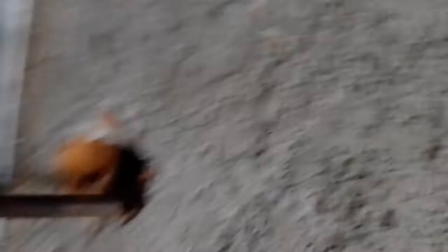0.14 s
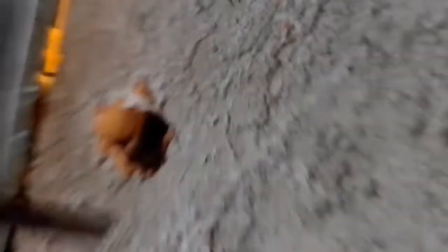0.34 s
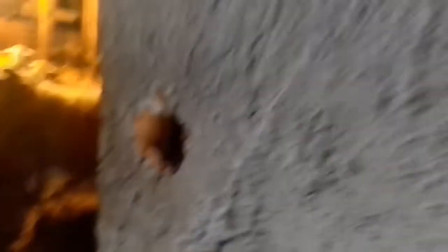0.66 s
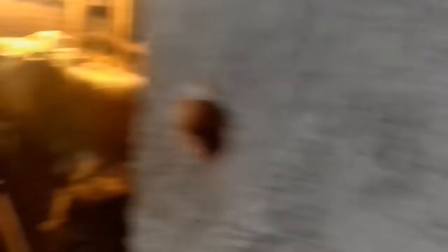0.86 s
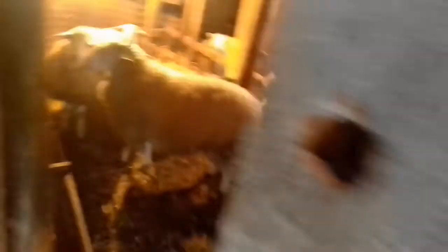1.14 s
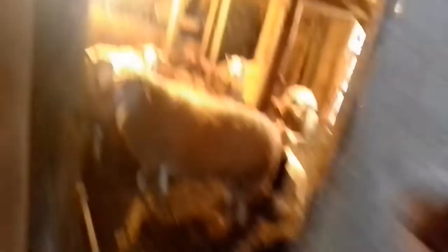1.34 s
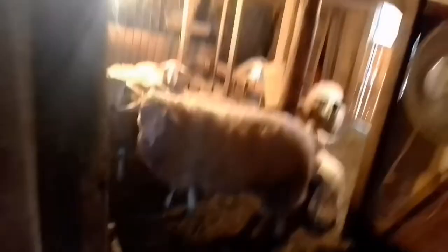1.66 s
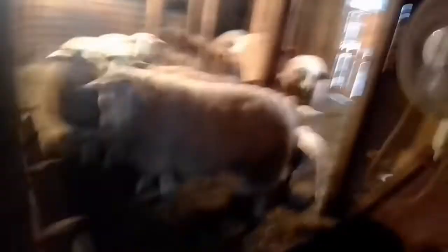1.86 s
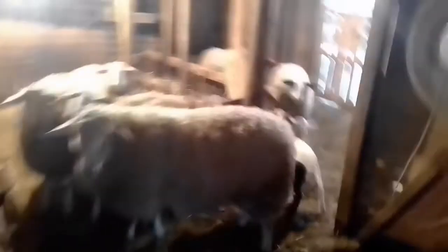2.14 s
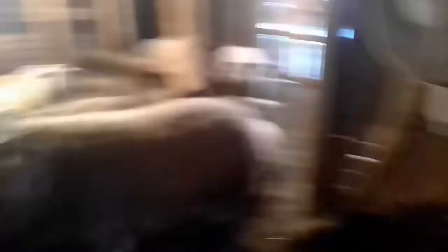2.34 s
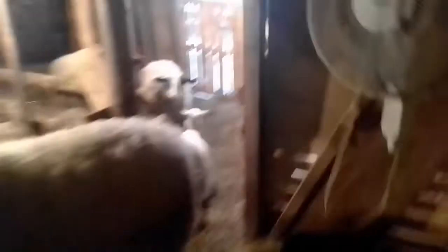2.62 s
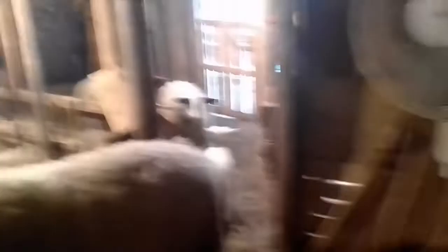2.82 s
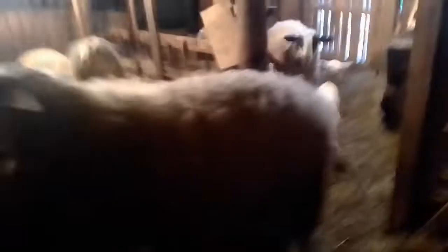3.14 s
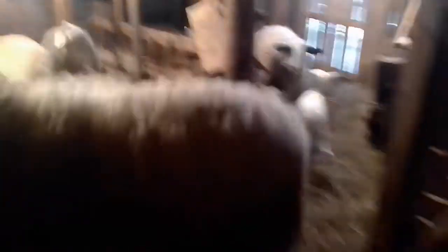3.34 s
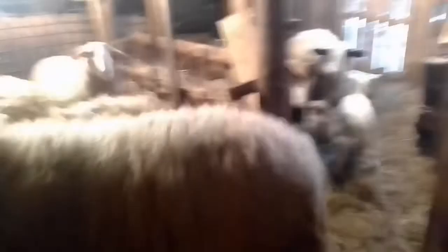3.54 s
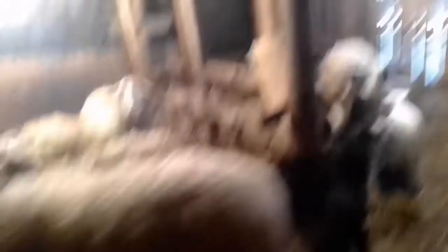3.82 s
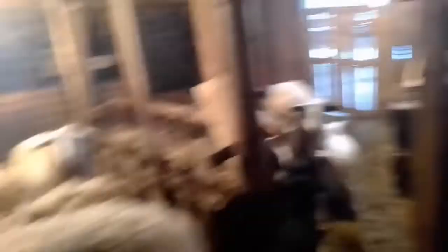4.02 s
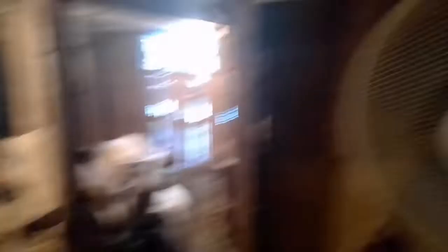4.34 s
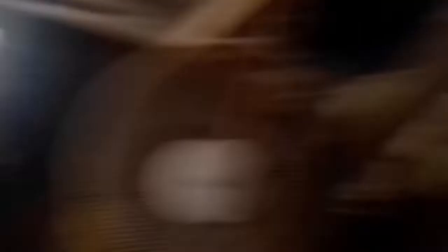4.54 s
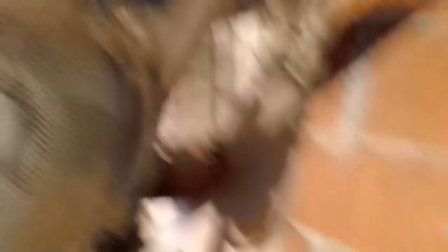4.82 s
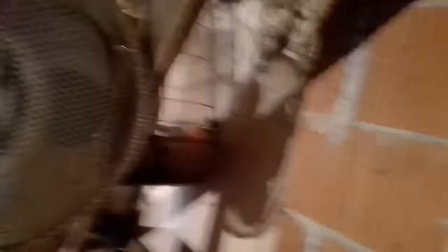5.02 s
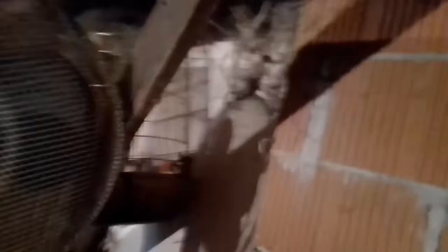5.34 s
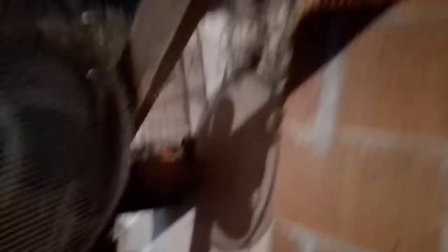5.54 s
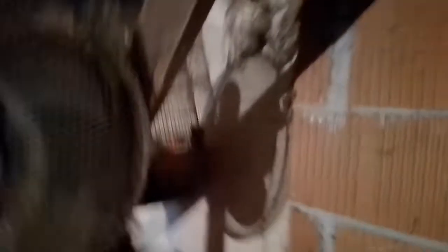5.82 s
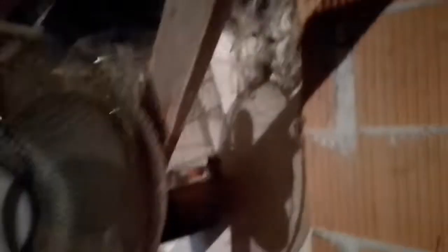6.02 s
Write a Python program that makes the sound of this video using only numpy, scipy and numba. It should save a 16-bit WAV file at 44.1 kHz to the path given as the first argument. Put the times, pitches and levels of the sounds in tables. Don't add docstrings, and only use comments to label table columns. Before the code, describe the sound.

Harsh metallic bolt clatter and knocks open, straw rustles, hinges squeak thinly, then a sheep gives a single raspy bleat before quiet rustling.

```python
import sys
import numpy as np
from scipy import signal
from scipy.fft import rfft, irfft, next_fast_len
from scipy.io import wavfile
from scipy.ndimage import uniform_filter1d
from numba import njit

SR = 44100
rng = np.random.default_rng(int(sys.argv[2]) if len(sys.argv) > 2 else 0)


def boost(x):
    u = np.asarray(x, float) / 20
    return 10 ** u


def output_pcm(signal):
    pcm = np.clip(np.atleast_2d(signal).T, -1, 1) * 32767
    wavfile.write(sys.argv[1], SR, np.round(pcm).astype(np.int16))


N = 271876
TIME = np.arange(N) / SR

# (time [s], level [dB])
FLOCK_LEVEL = [(0.0, -46), (.35, -59), (.44, -62), (.8, -63.5), (1.24, -75.5), (1.47, -58), (1.75, -54),
               (2.0, -49.5), (2.28, -62), (2.69, -61.5), (2.9, -67), (3.2, -54.5), (4.0, -61),
               (4.26, -64.5), (4.66, -64), (6.16, -66.5)]
# (frequency [Hz], density [dB per Hz])
FLOCK_COLOUR = [(110, -51.5), (180, -34.5), (231, -8), (409, -4), (982, -3), (1260, -4), (4470, -8),
                (5000, -9), (6500, -45), (11000, -120)]
# (centre [s], peak [dB], half length [s])
STEPS = [(.25, -42.5, 0.26), (1.0, -65, 0.061), (1.563, -51.5, 0.065), (1.672, -48.5, 0.045),
         (1.986, -44.5, 0.15), (2.298, -54, 0.11), (2.756, -56.5, 0.061), (2.91, -64, 0.036),
         (3.169, -46.5, 0.1), (3.553, -43.5, 0.37), (3.93, -35, .055), (4.03, -42, .07),
         (4.15, -49.5, 0.086), (4.404, -48.5, 0.22), (4.932, -47.5, 0.16), (5.4, -52, 0.1),
         (5.815, -49, 0.087), (5.97, -63.5, .03), (6.139, -51.5, 0.034)]
# (frequency [Hz], density [dB per Hz])
RUSTLE_COLOUR = [(1470, -39), (2500, -7.5), (2970, -13), (3410, -12), (5920, -6.5), (9580, 2.5),
                 (14800, -9.5), (16000, -17)]
# (frequency [Hz], density [dB per Hz])
RUMBLE_COLOUR = [(10, -3.5), (70, -4.5), (95, -12), (125, -29), (200, -45)]
# (frequency [Hz], density [dB per Hz])
HUSH_COLOUR = [(88, -57), (150, -24.5), (254, -8), (341, -5.5), (1100, -10.5), (1530, -5), (5050, -8),
               (9440, -3), (14800, -3), (16000, -13)]
# (start [s], length [s], frequency [Hz], level [dB])
SINGING = [(0.045, .045, 7560, -39), (0.073, 0.043, 8180, -17), (.025, .04, 12100, -46),
           (.074, .05, 12120, -28), (.076, .014, 12700, -32.5), (.085, .008, 2072, -13),
           (.099, .024, 2072, -11.5), (.128, .02, 2072, -15), (.085, 0.046, 3759, -19.5),
           (.128, 0.035, 3759, -23), (.09, 0.043, 780, -30), (.955, .025, 4350, -58),
           (.125, .04, 1210, -33), (1.768, 0.027, 1480, -58), (0.081, .07, 5300, -36),
           (.09, 0.045, 9210, -29.5), (.08, 0.11, 392, -35), (.172, 0.023, 501, -27.5),
           (0.205, 0.02, 7545, -33), (.2345, 0.008, 7545, -10), (.2345, 0.006, 8180, -9),
           (.252, 0.071, 11000, -30), (0.202, 0.02, 3759, -36), (2.03, .04, 15000, -43),
           (2.088, 0.053, 12690, -28), (2.03, 0.14, 13500, -46), (2.475, .025, 14000, -48),
           (2.475, .025, 13600, -42)]
# (start [s], length [s], frequency [Hz], level [dB])
SQUEALS = [(.84, 0.16, 11900, -46), (.84, 0.14, 15000, -53), (1.88, 0.046, 9300, -45),
           (1.97, .08, 8440, -40.5), (1.99, .045, 9900, -31), (2.076, 0.049, 9950, -35.5),
           (2.07, .05, 15200, -46), (2.505, 0.14, 9390, -24.5), (2.506, 0.11, 10040, -22.5),
           (2.52, .17, 10160, -31), (2.506, 0.155, 6260, -37), (2.701, 0.11, 1710, -59),
           (2.702, 0.089, 3820, -57.5), (3.223, 0.2, 9170, -31.5), (3.899, 0.16, 10030, -29.5),
           (3.905, 0.16, 11550, -35), (3.928, 0.24, 10600, -39), (4.171, 0.16, 1647, -57),
           (4.199, .14, 3750, -55), (4.25, 0.19, 12800, -49)]
# (start [s], length [s], frequency [Hz], level [dB])
CHATTER = [(0.091, 0.078, 1270, -20), (0.158, 0.02, 10500, -15), (.176, .014, 9700, -11),
           (.2305, .002, 7800, -24), (5.06, .02, 1400, -47), (1.555, .015, 3500, -26),
           (.118, .006, 7300, -18), (.84, .02, 950, -33), (.865, .02, 1900, -33), (.95, .06, 900, -49),
           (1.046, .006, 1650, -48), (0.254, 0.014, 14700, -9), (0.3, 0.08, 400, -50),
           (0.851, 0.1, 770, -40), (1.553, 0.0073, 3070, -23.5), (1.545, 0.018, 450, -42.5),
           (.652, .03, 2540, -31), (0.87, 0.041, 620, -37), (2.298, 0.035, 360, -59.5),
           (1.234, 0.01, 1440, -36), (1.234, 0.012, 3060, -33.5), (.655, 0.031, 1500, -34),
           (.92, 0.047, 1950, -45.5), (1.55, .02, 296, -57), (3.21, .025, 4000, -40),
           (1.166, .01, 1400, -41), (1.166, .008, 2900, -41), (.458, .004, 8800, -15),
           (.474, .003, 8800, -18), (.4845, .003, 7200, -16), (.254, .025, 11000, -18),
           (.278, .015, 7400, -24), (.513, .003, 9000, -33), (.85, .05, 2200, -32), (5.0, .04, 850, -48),
           (2.461, 0.048, 9900, -38.5)]
# (time [s], level [dB])
SCRAPE_LEVEL = [(.06, -62), (.078, -31.5), (.087, -22), (.13, -23.5), (.187, -20.5), (.195, -29),
                (.232, -26), (.29, -35), (.335, -33), (.42, -54)]
# (frequency [Hz], density [dB per Hz])
SCRAPE_COLOUR = [(120, -77), (200, -52), (330, -14), (450, -4.5), (1650, -11.5), (2050, -8.5),
                 (2860, -16.5), (3690, -12), (8420, -14.5), (16000, -32)]
# (time [s], clatter [dB], board [dB], thud [dB], decay t60 [s])
GATE_BLOWS = [(0.0768, -15, -22, -26, 0.3), (.0843, -9, -12, -5.5, 0.069), (0.1014, -4, -12, -26, 0.18),
              (.1294, -5, -11.5, -19, 0.3), (0.2342, 4, -19, -26, 0.061), (0.2528, 1, -27, -22, 0.094),
              (.2767, -2.5, -21.5, -18.5, 0.17), (0.2857, -6, -24, -34, 0.11),
              (.3194, -13.5, -39, -21.5, 0.15), (.452, -27, -22.5, -18, 0.16), (.458, -6, -23, -25, 0.14),
              (0.475, -11, -22, -22, 0.046), (0.4845, -9, -12, -20, .065), (0.6218, -34, -40, -30.5, .11),
              (0.6517, -9, -17, -17.5, 0.095), (0.8216, -26, -26.5, -27, 0.072),
              (0.8322, 2, -14.5, -18, 0.23), (.9348, -28, -50, -37, .047)]
# (until [s], frequency [Hz])
GATE_NOTES = [(.3, 2030), (.6, 1180), (.7, 1570), (.83, 3300), (1.0, 940)]
# (time [s], clatter [dB], board [dB], thud [dB], plank tone [Hz])
PEN_BLOWS = [(1.046, -46, -52, -38, 997.5), (1.089, -40.5, -50, -38.5, 1329),
             (1.1666, -57.5, -40, -35.5, 1367), (1.2339, -42, -31, -31, 3120),
             (1.4059, -21, -34.5, -34, 2360), (1.497, -40, -64.5, -66, 1850), (1.5464, -38, -45, -27, 1036),
             (1.5549, -27, -29, -33, 3270), (1.571, -36, -59, -33, 3330), (1.767, -23, -32, -59.5, 1458),
             (1.7823, -19, -31, -61, 2850), (1.811, -32, -44, -33, 2270), (1.8494, -31, -43, -49, 3050),
             (1.9386, -10, -27, -27.5, 1826), (2.0724, -29, -33, -37, 2100), (2.1598, -51, -46, -33.5, 972),
             (2.2444, -40.5, -52.5, -37.5, 956), (2.33, -37, -56, -55, 1360), (2.464, -47, -43, -61, 1010),
             (2.508, -25, -36, -32, 1950), (2.55, -27, -39, -36.5, 1530), (2.609, -30, -45, -35, 1330),
             (2.6965, -31.5, -48, -63, 1800)]
# (time [s], clatter [dB], board [dB], thud [dB])
AISLE_BLOWS = [(3.208, -21.5, -46, -61), (3.222, -24, -48, -55), (4.114, -29, -60, -68),
               (4.6146, -33.5, -44, -47), (4.9675, -35, -44, -42), (5.0094, -21.5, -36, -37),
               (5.0174, -24, -36.5, -50), (5.0592, -35, -56, -46), (5.3502, -43.5, -59, -58.5),
               (5.896, -38.5, -66.5, -64.5), (6.102, -39.5, -58, -58)]
# (frequency [Hz], density [dB per Hz])
CLATTER_COLOUR = [(2350, -28), (4000, -10.5), (5190, -7), (9170, 0.5), (12700, -8), (14600, -7.5),
                  (16000, -21.5)]
# (frequency [Hz], width [Hz], level [dB])
BOARD_MODES = [(2074, 740, -1.5), (2920, 1000, 2), (3730, 1500, -1.5), (4870, 790, -9.5)]
# (frequency [Hz], width [Hz], level [dB])
THUD_MODES = [(454, 250, -9), (723, 240, -4.5), (1030, 270, 2), (1275, 620, 1), (1640, 470, 1)]
# (band centre [Hz], t60 [s])
BARN_DECAY = [(500, 0.33), (1500, 0.17), (4000, 0.23), (12000, 0.28)]
# (time [s], level [dB])
THUMPS = [
    (.1, -44),
    (0.236, -31),
    (0.834, -53),
    (3.61, -53),
]
# (time [s], pitch [Hz], effort [dB])
BLEAT = [
    (3.25, 213, -25),
    (3.31, 205, -19.5),
    (3.37, 162, -11),
    (3.5, 171.2, -12.5),
    (3.59, 163.1, -14),
    (3.73, 170, -16),
    (3.86, 156.5, -13.5),
    (3.905, 145.3, -25),
    (3.99, 144.8, -59),
]
# (time [s], roughness [0-1], strong-weak share [0-1])
HOARSENESS = [(3.25, .45, .55), (3.34, .45, .6), (3.53, .4, .4), (3.6, .33, .2), (3.7, .18, .05),
              (3.8, .28, .15), (3.86, .3, .2), (3.91, .12, 0)]
# (deepest at [s], depth [dB], closing time [s])
CATCHES = [(3.271, 12, .014), (3.287, 5, .006), (3.304, 5, .007), (3.327, 9, .014), (3.355, 18, .008),
           (3.381, 5, .006), (3.4, 8, .02), (3.46, 9, .02), (3.531, 5, .016), (3.592, 2, .01),
           (3.654, 5, .008), (3.731, 4, .01), (3.783, 2, .01), (3.84, 3, .015)]
# (time [s], front resonance [Hz], lip resonance [Hz], low throat resonance [Hz])
MOUTH = [(3.25, 2250, 2800, 760), (3.34, 2100, 2800, 800), (3.39, 2350, 3040, 830), (3.43, 2100, 2600, 810),
         (3.5, 2130, 2700, 800), (3.57, 2280, 2800, 760), (3.76, 2420, 2950, 700), (3.88, 2620, 3000, 750),
         (3.93, 2620, 3000, 715)]
# (frequency [Hz], width [Hz], level [dB])
TONGUE_MODES = [(1780, 190, 0)]
# (frequency [Hz], width [Hz], level [dB])
THROAT_MODES = [(990, 110, -8), (1360, 70, -10)]
# (frequency [Hz], width [Hz], level [dB])
RASP_MODES = [(3800, 260, -1), (3300, 250, -5), (4550, 450, -1), (5480, 640, -0.5), (6000, 500, 2.5),
              (6400, 480, 2), (7100, 600, 0), (7800, 600, -1), (8500, 500, 3), (9100, 400, 3),
              (10000, 300, -1)]
# (time [s], frequency [Hz])
RASP_TOP = [
    (3.42, 5500),
    (3.6, 9500),
]
# (time [s], level [dB])
SNAP_LEVEL = [
    (3.36, -9),
    (3.47, -2),
]


def level(x):
    return x / np.sqrt(np.mean(x ** 2) + 1e-30)


def curve(rows, off=None):
    s, *columns = np.transpose(rows)
    return [np.interp(TIME, s, c, off, off) for c in columns]


def colour(x, points):
    size = next_fast_len(len(x))
    hz, db = np.transpose(points)
    bin_hz = np.arange(size // 2 + 1) * SR / size
    gain = boost(np.interp(np.log(bin_hz + 1), np.log(hz), db))
    return level(irfft(rfft(x, size) * gain, size)[:len(x)])


def butter(x, order, hz, kind):
    return signal.sosfilt(signal.butter(order, hz, kind, fs=SR, output="sos"), x)


@njit
def svf(x, hz, width):
    y, b, l = np.empty(len(x)), 0., 0.
    for i in range(len(x)):
        g, k = np.tan(np.pi * hz[i] / SR), width / hz[i]
        v = (b + g * (x[i] - l)) / (1 + g * (g + k))
        b, l, y[i] = 2 * v - b, l + 2 * g * v, k * v
    return y


def resonate(x, modes):
    out = 0
    for k, (hz, width, db) in enumerate(modes):
        out = out + (-1) ** k * boost(db) * svf(x, np.full(len(x), 1. * hz), 1. * width)
    return out


def walk(rate, size=N):
    k = int(SR / rate)
    held = np.repeat(rng.standard_normal(size // k + 1), k)
    return 1.3 * uniform_filter1d(uniform_filter1d(held, k), k)[:size]


def grains(rate, spread_db):
    size = boost(spread_db * np.minimum(rng.exponential(size=N), 3))
    size = size * (rng.random(N) < rate / SR)
    return rng.standard_normal(N) * np.sqrt(1 + uniform_filter1d(size ** 2, size=60) * 10)


def flock():
    return boost(curve(FLOCK_LEVEL)[0] + 2 * walk(40)) * colour(grains(150, 1.8), FLOCK_COLOUR)


def still_air():
    rumble = boost(-76 + 2 * walk(25)) * colour(rng.standard_normal(N), RUMBLE_COLOUR)
    return rumble + boost(-56) * colour(rng.standard_normal(N), HUSH_COLOUR)


def rustle():
    moving = boost(-61)
    for s, db, half in STEPS:
        moving = moving + boost(db) * np.exp(-((TIME - s) / half) ** 2)
    return moving * boost(2.1 * walk(25)) * colour(grains(300, 1.7), RUSTLE_COLOUR)


def squeaks():
    out, size = np.zeros(N), int(.6 * SR)
    t = np.arange(size) / SR
    rubs = [(*r, 20.5 + .0015 * r[2]) for r in SINGING]
    rubs += [(*r, 120) for r in SQUEALS]
    rubs += [(*r, .2 * r[2]) for r in CHATTER]
    for start, length, hz, db, width in rubs:
        contact = np.clip(t / .002, 0, 1) * np.clip((length - t) / .015 + 1, 0, 1)
        patchy_db = np.clip(width / 40, 1, 2.2) * walk(60, size=size)
        rub = contact * boost(patchy_db - 5 * t / length)
        slip_hz = hz * (1 + .002 * walk(20.3, size=size))
        tone = np.sin(2 * np.pi * np.cumsum(slip_hz) / SR)
        lock = 2.8 * np.exp(-width / 50) * np.sqrt(width / SR * 6) * tone
        lock = lock * (1 + np.exp(-t / .003) / (np.pi * width * .006))
        force = rub * (rng.standard_normal(size) + lock)
        held = np.exp(-np.clip(t - length - .015, 0, 1) / .02)
        i = int(start * SR)
        out[i:i + size] += held * boost(db) * np.sqrt(SR / width / 6) * svf(force, slip_hz, 1. * width)
    return out


def scrape():
    scrape_db = curve(SCRAPE_LEVEL, off=-120)[0] - 5 + 3.5 * walk(150)
    return boost(scrape_db) * colour(grains(600, 3.85), SCRAPE_COLOUR)


def knocks():
    drive, notes = np.zeros((4, N)), np.zeros(N)
    shiver = rng.standard_normal(N)
    blows = []
    for *blow, t60 in GATE_BLOWS:
        note_hz = next(hz for until, hz in GATE_NOTES if blow[0] < until)
        blows.append((*blow, note_hz, t60, t60))
    blows += [(*b, 0.13, .065) for b in PEN_BLOWS]
    blows += [(*b, 1400, 0.15, 0.16) for b in AISLE_BLOWS]
    for s, clatter_db, board_db, thud_db, note_hz, t60, wood_t60 in blows:
        i = int(s * SR)
        t = np.arange(min(int(.5 * SR), N - i)) / SR
        now = slice(i, i + len(t))
        fade, wood_fade = (np.log(1000) * t / np.clip(d, .01, .5) for d in (t60, wood_t60))
        crack = 1.4 * np.exp(-t / .0012)
        drive[0, now] += boost(2 * clatter_db) * (np.exp(-fade) + crack) ** 2
        drive[1, now] += boost(2 * board_db) * (np.exp(-wood_fade / 1.28) + .5 * crack) ** 2
        for row, longer, rise_s in ((2, 1.37, 0.0039), (3, 1.4, 0.024)):
            drive[row, now] += boost(2 * thud_db) * (np.exp(-wood_fade / longer) * (1 - np.exp(-t / rise_s))) ** 2
        shiver[i + 4] = -4
        note_fade = np.exp(-np.log(1000) * t / min(wood_t60, .07))
        notes[now] += boost(max(board_db, thud_db)) * note_fade * np.sin(2 * np.pi * note_hz * t)
    drive = drive * boost(2 * 1.4 * np.array([walk(250) for _ in drive]))
    board, thud, body = np.sqrt(drive[1:]) * rng.standard_normal((3, N))
    steel = np.sqrt(drive[0]) * colour(shiver, CLATTER_COLOUR)
    wood = boost(1.5) * resonate(board, BOARD_MODES) + boost(6.5) * resonate(thud, THUD_MODES[2:])
    wood = wood + boost(8) * resonate(body, THUD_MODES[:2])
    return boost(-16.0) * steel + wood + boost(-10.5) * notes


def barn(x):
    t = np.arange(int(.7 * SR)) / SR
    tail = 0
    for hz, t60 in BARN_DECAY:
        band = resonate(rng.standard_normal(len(t)), [(hz, hz, 0)]) / np.sqrt(hz)
        tail = tail + band * np.exp(-np.log(1000) * t / t60)
    tail = tail * (t > .004)
    return signal.fftconvolve(x, tail / np.sqrt(np.sum(tail ** 2)))[:N]


def thumps():
    return sum(boost(db) * np.exp(-((TIME - s) / 0.001) ** 2) for s, db in THUMPS)


def pen_walls(x):
    for lag in (37, 61, 107, 173):
        ends = np.zeros(lag + 1)
        ends[[0, lag]] = 1, -.55
        x = signal.lfilter(ends[::-1], ends, x)
    return x


def swell(start_db, swell_s, hold_db, sag, release_s, release):
    t = TIME - 3.25
    rise = start_db + (hold_db - start_db) * np.clip(t / swell_s, 0, 1)
    return rise - sag * np.clip(t - swell_s, 0, 1) - release * np.clip(TIME - release_s, 0, 1)


def glottis(hz, rough, uneven):
    phase = np.cumsum(hz * (1 + .055 * rough * walk(100) + .015 * walk(25)) / SR)
    cycle = phase.astype(int)
    scatter = boost(2.2 * rough * rng.standard_normal(N)[cycle])
    size = scatter * (1 - uneven * (cycle % 2))
    late = np.clip(phase % 1 * SR / hz, 0, 1)
    closings = np.diff(cycle, prepend=0) * np.array([size, scatter * size ** .3])
    pulses, clicks = (level(c * (1 - late) + np.roll(c * late, -1)) for c in closings)
    breath = level(rng.standard_normal(N) * np.sqrt(size) * (.5 + np.exp(-(phase % 1) / .4)))
    return pulses, clicks, breath


def mouth_tone(voice, front_hz, lip_hz):
    tongue_db = -4.5 - .009 * (front_hz - front_hz[0])
    mouth = svf(voice, front_hz, 125.) - boost(tongue_db) * resonate(voice, TONGUE_MODES)
    mouth = mouth - boost(-8.5) * svf(voice, lip_hz, 200.)
    return butter(mouth, 3, [1560, 3250], "band")


def throat_tone(clear, low_hz):
    low = resonate(svf(clear, low_hz, 98.0) - resonate(clear, THROAT_MODES), [(820, 770, 0.002)])
    low = butter(low, 2, 540, "high")
    valley = resonate(low, [(1190, 140, 0)])
    return low - valley + boost(-27) * resonate(clear, [(424, 150, 0.0028)])


def rasp_tone(clicks, breath, rough):
    snap_band = signal.butter(3, [3900, 10200], "band", fs=SR, output="sos")
    snap = -signal.sosfiltfilt(snap_band, clicks * boost(2 * walk(90)))
    rasp, source = 0, clicks + (1.2 + rough) * breath
    for k, (hz, width, db) in enumerate(RASP_MODES):
        mode = svf(source, hz * (1 + .025 * walk(12)), 1. * width)
        rasp = rasp - (-1) ** k * boost(db + 2 * walk(30)) * mode
    rasp = butter(rasp, 4, [3100, 10600], "band")
    echoed_snap = level(snap - .3 * np.roll(snap, int(.0019 * SR)))
    rasp = level(rasp + .6 * pen_walls(rasp)) + boost(curve(SNAP_LEVEL)[0]) * echoed_snap
    return level(rasp - .4 * svf(rasp, 1.45 * curve(RASP_TOP)[0], 3500.))


def sheep():
    hz, effort_db = curve(BLEAT)
    front_hz, lip_hz, low_hz = curve(MOUTH)
    rough, uneven = curve(HOARSENESS)
    low_db = swell(-49, .1, -34.5, sag=4, release_s=3.925, release=500)
    rasp_db = swell(-36, .21, -21, sag=3, release_s=3.885, release=120)
    pulses, clicks, breath = glottis(hz, rough, uneven)
    voice = np.sqrt(1 - rough) * pulses + .8 * np.sqrt(rough) * breath
    clear = pulses + (.1 + 2.1 * rough) * breath
    catch_db = 0
    for s, db, half in CATCHES:
        half = np.where(TIME < s, half, .25 * half)
        catch_db = catch_db - db * np.exp(-((TIME - s) / half) ** 2)
    mouth = mouth_tone(voice, front_hz, lip_hz)
    low = throat_tone(clear, low_hz)
    bright = boost(effort_db) * level(.8 * mouth + pen_walls(mouth))
    bright = bright + boost(rasp_db - catch_db / 5) * rasp_tone(clicks, breath, rough)
    low_db = low_db + 6 * np.exp(-((TIME - 3.905) / .025) ** 2)
    on = curve([(3.252, 0), (3.256, 1), (3.97, 1), (4.0, 0)])[0]
    return on * (boost(catch_db) * bright + boost(low_db + catch_db / 2) * level(pen_walls(low)))


def scene():
    gate = squeaks() + scrape() + knocks()
    voice = sheep()
    air = gate + voice + barn(boost(-14.0) * gate + boost(-21) * voice)
    air = butter(np.clip(air, -.8, .8), 4, 260, "high")
    return (air + thumps() + flock() + still_air() + rustle())[None]


def top_cut(x):
    return signal.sosfilt(signal.butter(12, 16670, fs=SR, output="sos"), x)


def record(dry):
    low_pass = signal.ellip(10, .2, 70, 15450, fs=SR, output="sos")
    dull = signal.sosfilt(low_pass, np.clip(dry, -.92, .92))
    return top_cut(dull - .0009)


dry = scene()
out = record(dry)
output_pcm(out)
```